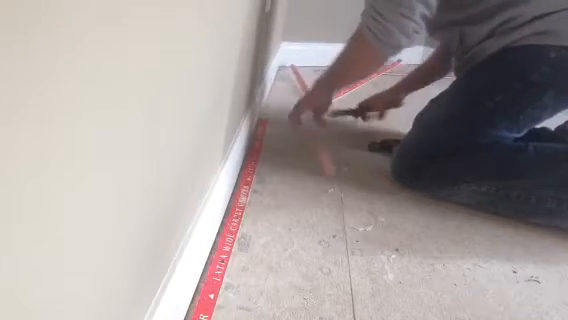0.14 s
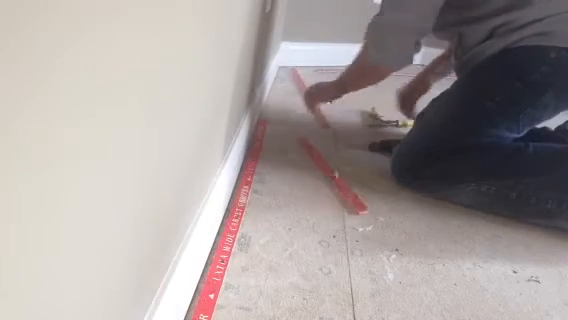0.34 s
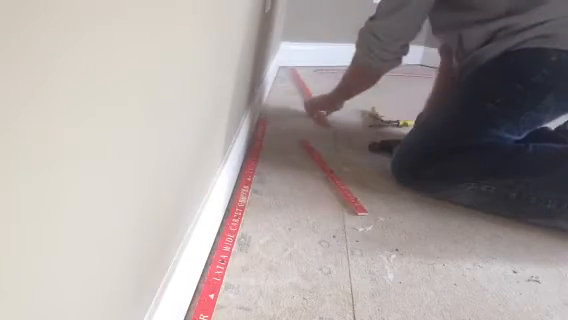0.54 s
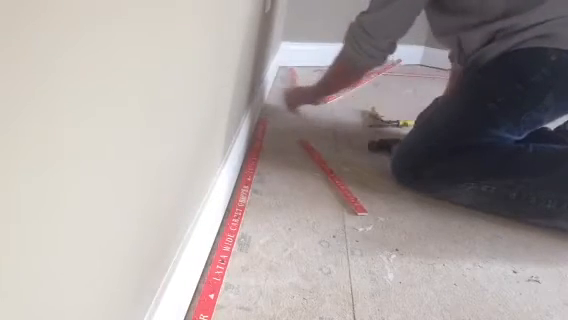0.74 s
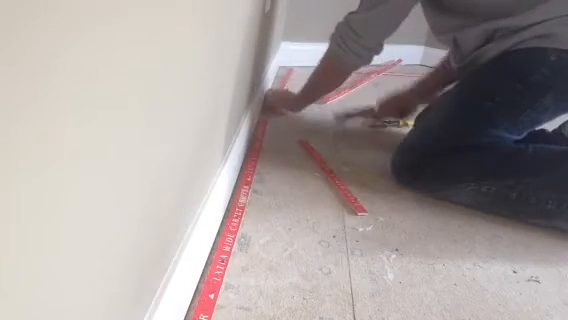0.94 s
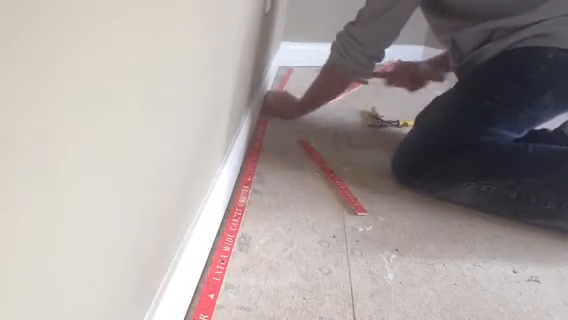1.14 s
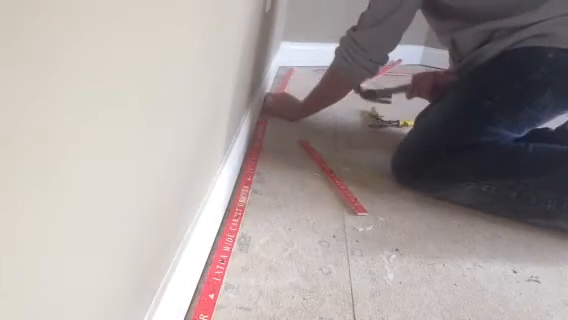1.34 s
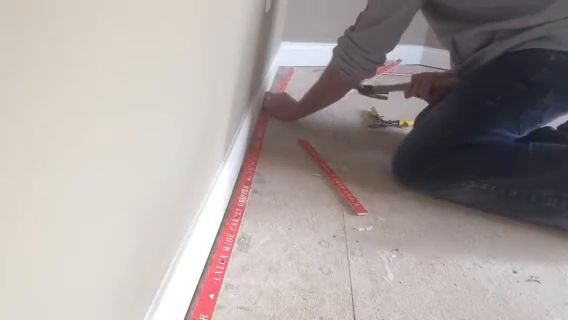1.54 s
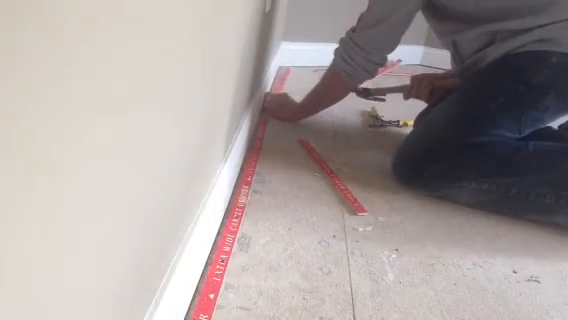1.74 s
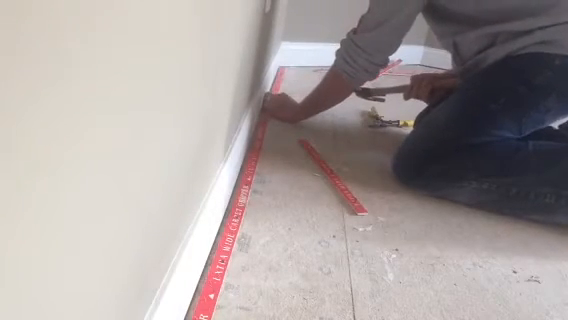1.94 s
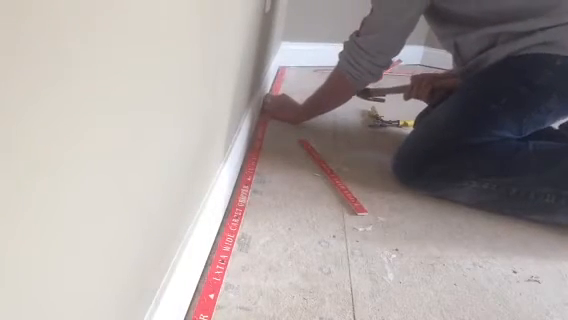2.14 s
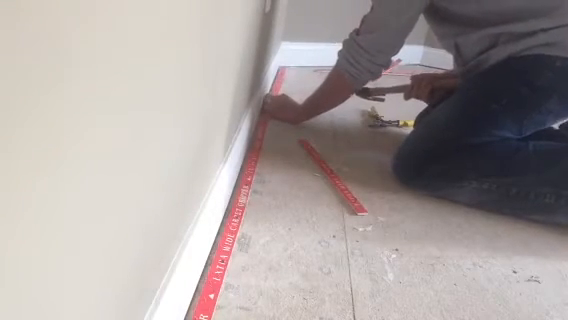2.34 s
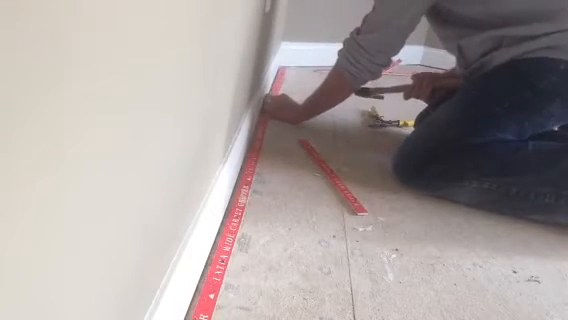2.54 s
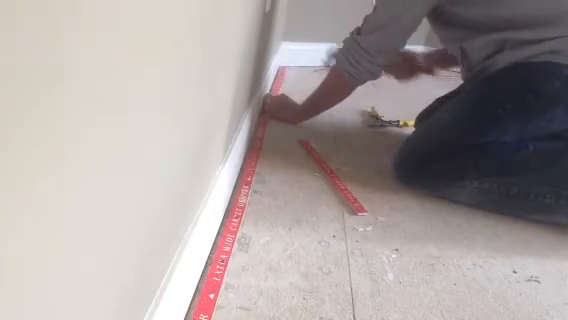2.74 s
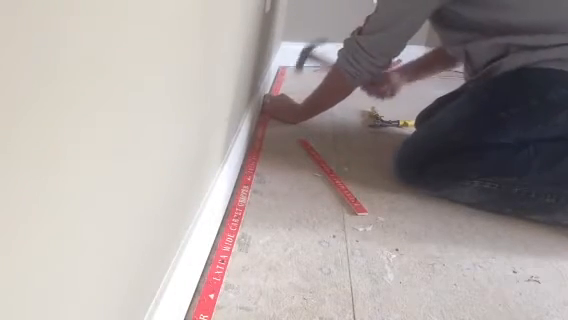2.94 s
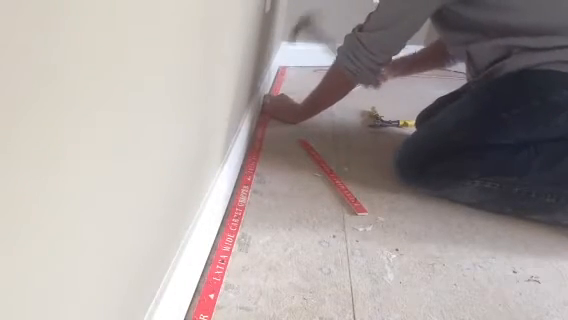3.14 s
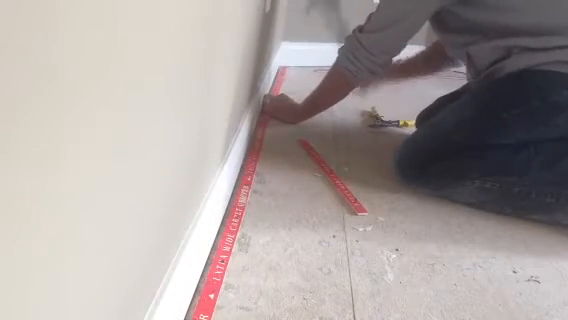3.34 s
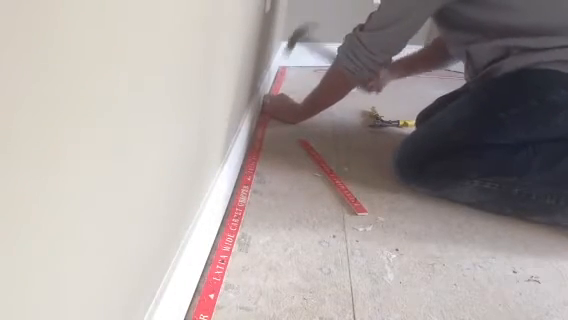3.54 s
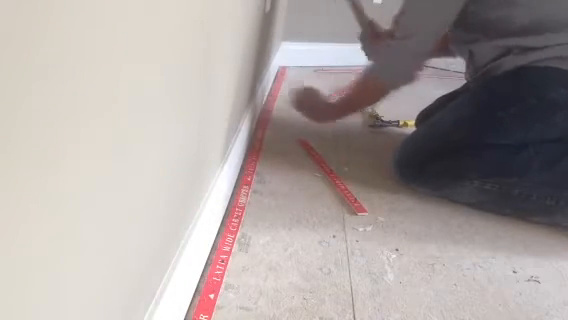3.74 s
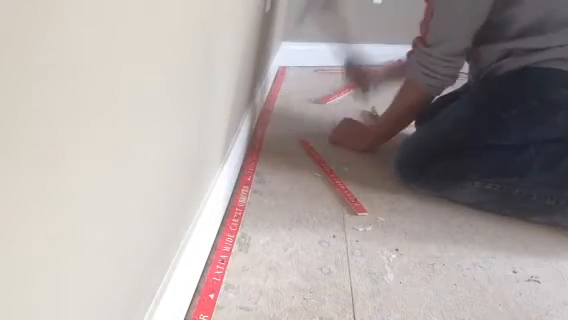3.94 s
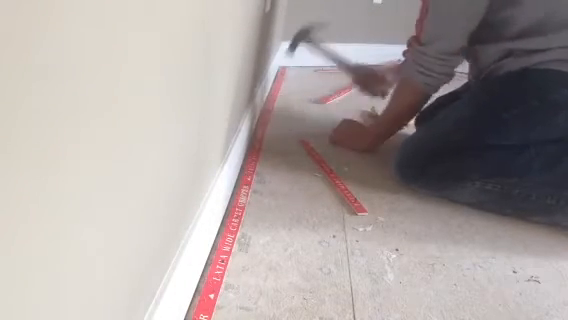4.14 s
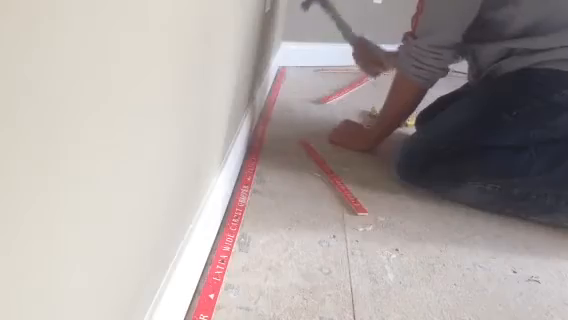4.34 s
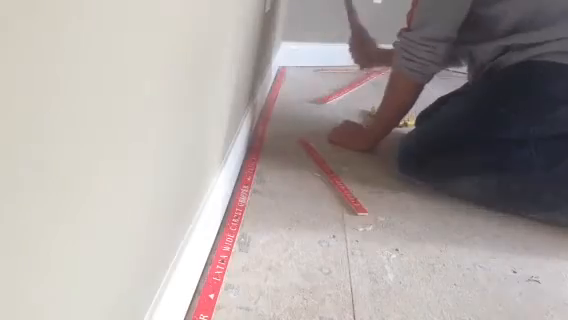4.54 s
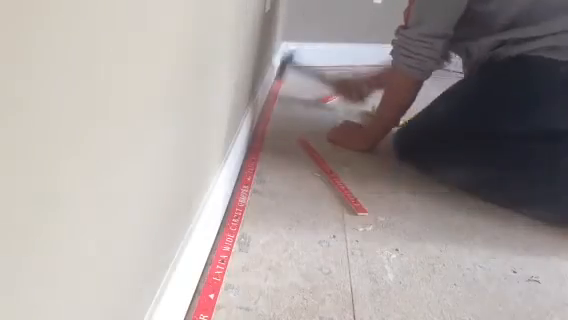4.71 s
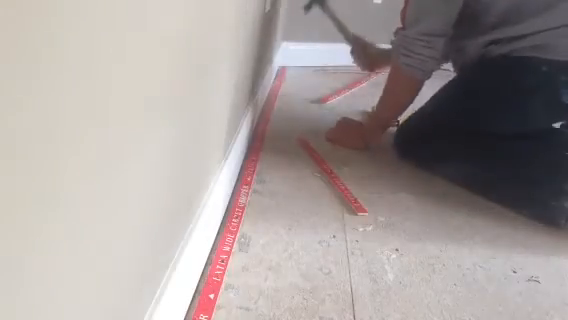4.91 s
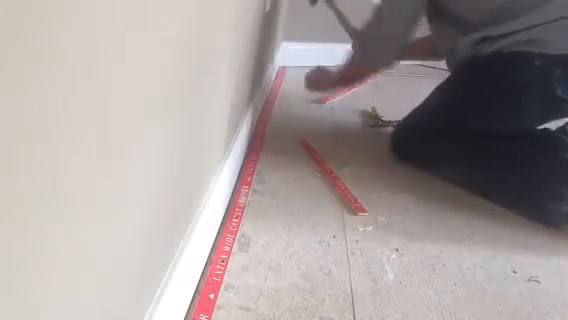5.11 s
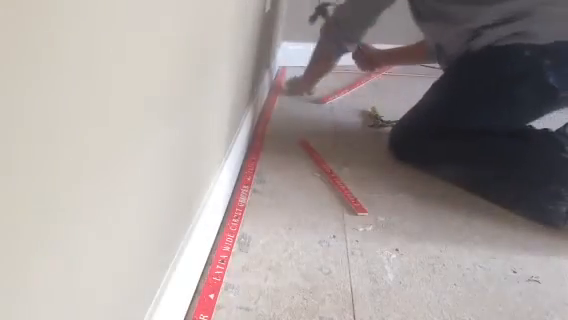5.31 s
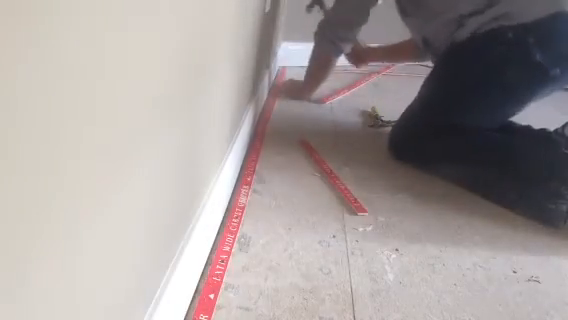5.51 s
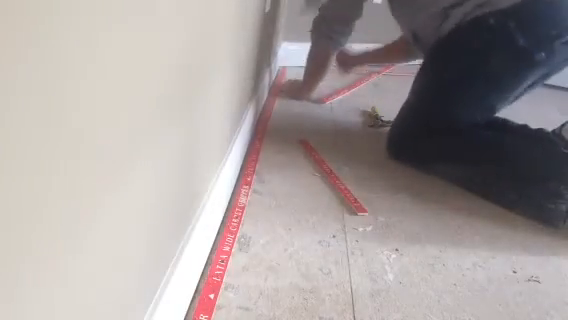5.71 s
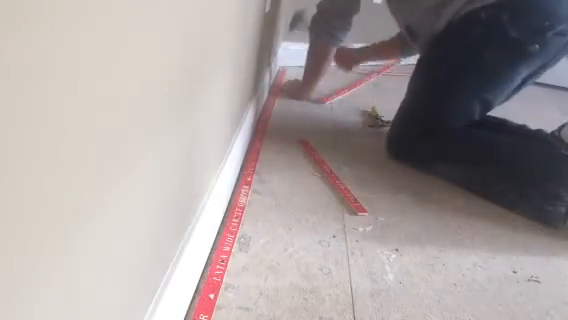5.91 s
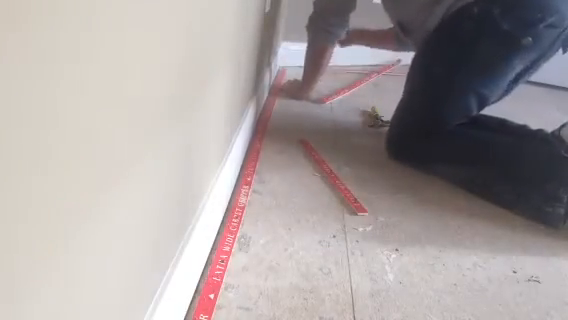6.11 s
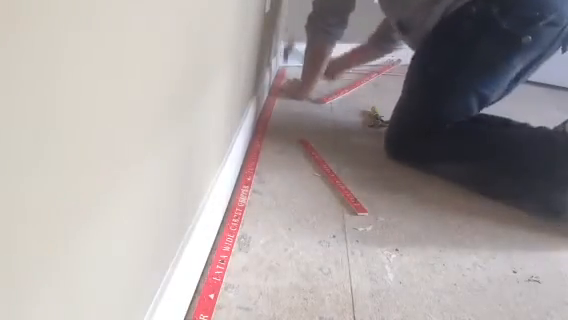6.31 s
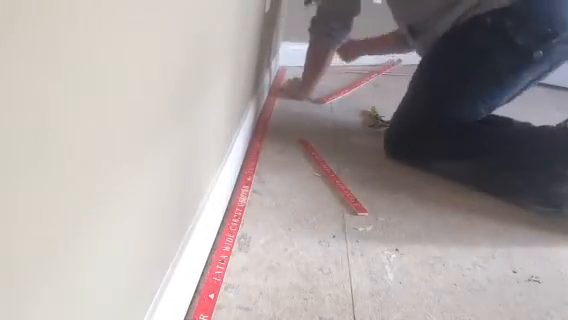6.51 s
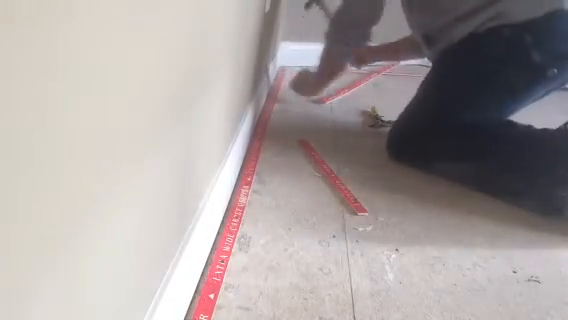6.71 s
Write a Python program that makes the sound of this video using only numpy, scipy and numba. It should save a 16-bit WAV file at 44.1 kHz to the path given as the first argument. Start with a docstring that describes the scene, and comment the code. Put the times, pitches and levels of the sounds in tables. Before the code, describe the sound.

A bare, reverberant room with a wooden board floor, heard from a fairly close microphone over faint low rumble and hiss. At the start the echo of a hammer blow is still dying away. Between about 0.1 and 0.45 s a thin wooden strip and tools drop in a quick, dry, bright clatter, densest around 0.3 to 0.44 s. From 0.8 to 2.2 s there are soft dull bumps of knees and tools, with low shuffling and slight cloth rustle; a very faint stir near 2.6 to 3 s, otherwise quiet. Then hard hammer blows on nails through thin wood: 3.5, 4.1, 4.8, 5.9 and 6.4 s. Each is a short woody knock, with a steely edge on some, its flattened peak followed by a swelling room echo lasting over a second. The blow at 5.9 s is brighter and sharper; the last rings out to the end.

```python
"""The room still rings from a hammer blow as a strip and tools clatter onto a board floor. Soft bumps and
distant footsteps follow amid rustling clothes; then nails go through thin wooden strips. Impacts excite damped
modes of wood and steel; noise with banded decay makes the empty room reverberate. Shaped noise gives cloth,
rumble and hiss. The recorder's limiter flattens loud blows, so that the room swells up behind them."""
import sys
import numpy as np
from scipy import signal
from scipy.io import wavfile
from scipy.ndimage import uniform_filter1d, minimum_filter1d
from numba import njit

SR = 44100
rng = np.random.default_rng(int(sys.argv[2]) if len(sys.argv) > 2 else 0)


def pcm_store(signal):
    """Save signal as 16-bit PCM."""
    levels = np.round(np.clip(np.atleast_2d(signal), -1, 1) * 32767)
    wavfile.write(sys.argv[1], SR, levels.astype(np.int16).T)


def rack_gain(trim_db):
    """Turn a fader trim in dB into the linear factor to multiply a signal by."""
    fader = np.asarray(trim_db, float)
    return 10 ** (fader / 20)


N = 302526
LEAD = SR // 4      # samples computed ahead of time zero, so that earlier sounds ring on into the scene

# hammer blows: t/s, relative level/dB, tilt/(dB per octave), relative steel crack level/dB,
# frequency favoured by the spot f/Hz, its boost/dB
BLOWS = [(-.12, -12.5, -7, 0.5, 211, 11), (3.535, 0, -2.5, -6, 1300, 11.5), (4.128, 5, -4, -10, 927, 5.5),
         (4.799, 2.5, -3, -23, 535, 6.5), (5.898, -6.5, 7, -1, 421, 4.5), (6.420, -1.5, 3, -30, 462, 10.5)]
# centres of the mode groups boom, board, joist, knock and crack: f/Hz
PART_HZ = [110, 230, 480, 1500, 5500]
# limits of third-octave bands, in Hz
BAND_EDGES_HZ = 22 * 2 ** np.arange(0, 9.8, 1 / 3)


def at_hz(points, hz, axis=1):
    """Interpolates a table column linearly in log frequency."""
    points = np.array(points)
    return np.interp(np.log(hz), np.log(points[:, 0]), points[:, axis])


def band(x, low, high):
    """Butterworth band-pass: maximally flat between its two cut-off frequencies in Hz."""
    return signal.sosfilt(signal.butter(2, [low, high], "band", fs=SR, output="sos"), x)


def rms_one(x):
    """Normalises the mean power to one."""
    return x / np.sqrt(np.mean(x ** 2) + 1e-20)


def add(out, sound, s):
    """Superposition: a sound is summed in from time s on."""
    at = LEAD + round(s * SR)
    out[at:at + len(sound)] += sound[:len(out) - at]


def hush():
    """Stationary noise with a set spectral density: rumble of the house and hiss of the microphone."""
    # noise spectrum: f/Hz, relative spectral density level/dB
    spectrum = [(15, -43.5), (25, -13.5), (64, 1.5), (130, -2), (439, -18.5), (516, -26), (1840, -30.5),
                (2220, -30.5), (3340, -35.5), (4250, -33), (10100, -48.5), (14800, -45), (16000, -73)]
    hush_db = -57.5
    white = rng.standard_normal((2, N + LEAD))
    total = 0
    for k, (low, high) in enumerate(zip(BAND_EDGES_HZ, BAND_EDGES_HZ[1:])):
        density = rack_gain(at_hz(spectrum, np.sqrt(low * high)))
        total = total + density * band(white[k % 2], low, high)     # adjacent bands are independent
    return rack_gain(hush_db) * rms_one(total[LEAD:])


def moving():
    """Friction noise under exponential swells: dull shuffling on boards and grainy rustle of cloth."""
    # movements of cloth and knees: t/s of the peak, shuffle level/dB, rustle level/dB
    stirs = [(.9, -40, -66), (1.1, -66, -61), (1.3, -72, -66), (1.46, -49, -69), (1.68, -73, -67.5),
             (1.91, -49.5, -62), (2.22, -55.5, -67), (2.7, -91, -83), (2.96, -68, -67)]
    rise_db_per_s, fall_db_per_s = 137.5, 84
    peak_s, shuffle_db, rustle_db = np.transpose(stirs)
    since = np.arange(N)[:, None] / SR - peak_s
    swell = rack_gain(np.minimum(rise_db_per_s * since, -fall_db_per_s * since))
    white = rng.standard_normal((2, N))
    # random bursts of strength make the noise grainy
    grains = white[1] * rack_gain(3.8 * np.minimum(rng.exponential(1, N), 4))
    shuffle = swell @ rack_gain(shuffle_db) * rms_one(band(white[0], 202, 864))
    rustle = swell @ rack_gain(rustle_db) * rms_one(band(grains, 900, 6100))
    return shuffle + rustle


def room():
    """Reverberation at one spot: diffuse echoes build up and decay per band, first fast, then slowly."""
    # reverberation by frequency: f/Hz, late decay time t60/s, relative echo level/dB
    reverberation = [(61, 1.1, -8), (100, 0.35, -1.5), (172.8, 0.58, 2), (260, 1.066, 0), (323, 1.11, 4.5),
                     (483, 2.05, -1), (723, 1.81, -0.5), (963, 2.27, -5), (1396, 1.69, -3.5),
                     (2350, 1.37, 1.5), (3700, 1.375, -4), (6150, 1.074, 0), (10000, 0.61, 4.5),
                     (16200, 0.52, -1)]
    # lone echoes from the nearest walls: delay t/ms before a random shift of up to 5 %, level/dB
    wall_echoes = [(14, -21), (19, -12), (25, -14), (38, -21.5), (50, -13), (61, -16)]
    echo_db, first_echo_s, build_s = 2.5, 0.0063, 0.0089
    early_db, early_share = 4, 0.45     # early decay: its level, its t60 as a share of the late one
    corner_db, corner_fade_s = -20, 0.0027

    t = np.arange(2 * SR) / SR
    white, tail = rng.standard_normal((2, len(t))), 0
    for k, (low, high) in enumerate(zip(BAND_EDGES_HZ, BAND_EDGES_HZ[1:])):
        hz = np.sqrt(low * high)
        fall_db = -60 * t / at_hz(reverberation, hz)
        decay = rack_gain(fall_db) + rack_gain(early_db + fall_db / early_share)
        strength = rack_gain(at_hz(reverberation, hz, axis=2))
        tail = tail + band(white[k % 2], low, high) * decay * strength
    build = 1 - np.exp(-np.maximum(t - first_echo_s, 0) / build_s)
    echoes = rack_gain(echo_db) * rms_one(tail * build) / np.sqrt(len(t))     # unit energy, then its level
    # scatter from the skirting and tools right beside the hit
    scatter = band(rng.standard_normal(len(t)), 490, 17000) * np.exp(-t / corner_fade_s)
    echoes += rack_gain(corner_db) * scatter
    for ms, level_db in wall_echoes:
        echoes[round(ms * SR / 1000 * rng.uniform(.95, 1.05))] += rack_gain(level_db)
    return echoes


def ring(clicks, hz, t60):
    """Damped resonator: a unit click sets a sine ringing from height 1, falling 60 dB in t60 seconds."""
    r, w = rack_gain(-60 / (t60 * SR)), 2 * np.pi * hz / SR
    return signal.lfilter([0, np.sin(w)], [1, -2 * r * np.cos(w), r * r], clicks + 1e-18)


def impact(levels_db, favoured_hz=1000, favoured_db=0):
    """Modal superposition: a click excites each mode by its own strength; odd and even modes in two rows."""
    # modes of floor, strip and hammer head, one list per part: f/Hz, relative level/dB, t60/s
    part_modes = [
        [(70, -3, 0.024), (82, -1, 0.14), (127, -1.5, 0.036), (172.7, -3, 0.12)],
        [(163, 9, 0.046), (230.6, 0.5, 0.041), (262.4, -2.5, 0.039), (318, -8, 0.037)],
        [(384.8, -11.5, 0.054), (471, -4, 0.029), (537, -2, 0.018)],
        [(717, -0.5, 0.01), (888, -3.5, 0.01), (1014, -2.5, 0.01), (1360, -0.5, 0.01), (1576, -5, 0.0085),
         (1964, 0.5, 0.0055), (2510, -1.5, 0.0046), (3050, -2.5, 0.0029)],
        [(3620, 0, 0.0034), (3933, 1.5, 0.0022), (4720, 1, 0.0019), (6470, 1.5, 0.00096), (8580, -3.5, 0.00063),
         (11600, -26.5, 0.0003), (13800, -13, 0.0017)],
    ]
    favour_octaves, mode_spread_db = 0.19, 3
    click = signal.unit_impulse(SR // 4)
    centres = list(zip(PART_HZ, levels_db))     # strength glides from the centre of one part to the next
    modes = [(at_hz(centres, hz) + db, hz, t60)
             for part in part_modes[:len(centres)] for hz, db, t60 in part]
    octaves = np.log2(np.array(modes)[:, 1] / favoured_hz)
    spot_db = favoured_db * np.exp(-(octaves / favour_octaves) ** 2)
    spot_db = spot_db + mode_spread_db * rng.standard_normal(len(modes))
    # neighbours in opposite phase leave no holes between them
    rings = np.array([ring(click, hz, t60) * rack_gain(db + spot_db[k]) * (-1) ** k
                      for k, (db, hz, t60) in enumerate(modes)])
    halves = [rings[0::2].sum(axis=0), rings[1::2].sum(axis=0)]
    return signal.sosfilt(signal.butter(4, 62, "high", fs=SR, output="sos"), halves)


def struck(row, wood_db):
    """Excitation spectrum: the wood's answer, tilted by how hard and where it is hit, and the steel crack."""
    db, tilt_db, crack_db = row[1:4]
    wood = [db + own_db + tilt_db * np.log2(hz / PART_HZ[2]) for hz, own_db in zip(PART_HZ, wood_db)]
    return wood + [crack_db]


def smeared(sound, ms):
    """Convolution with a noise swell: many small pushes draw a sound out at unchanged energy."""
    size = round(ms * SR / 1000)
    pushes = rng.standard_normal(size) * np.hanning(size)
    swell = signal.fftconvolve(sound, pushes[None], axes=1)
    return swell * np.linalg.norm(sound) / np.linalg.norm(swell)


def heard(rows, sounds, rooms, shadow_hz, direct_db, echo_db):
    """Direct plus reverberant sound; arms and knees shade the treble of the direct path."""
    out = np.zeros(N + LEAD)
    shadow = signal.butter(1, shadow_hz, fs=SR, output="sos")
    for k, (row, sound) in enumerate(zip(rows, sounds)):
        direct = signal.sosfilt(shadow, sound.sum(axis=0))
        add(out, rack_gain(direct_db) * direct, row[0])
        for side, half in enumerate(sound):     # the two sets of modes radiate in other directions
            echo = signal.fftconvolve(half, rooms[(k + side) % len(rooms)])
            add(out, rack_gain(echo_db) * echo, row[0])
    return out


def bumps(rooms):
    """Long contacts excite the lower modes only: soft, dull bumps on the boards and distant footsteps."""
    # t/s, relative boom level/dB, relative board level/dB, relative joist level/dB, contact time t/ms
    bump_rows = [(0.819, -24.5, -32, -45.5, 32.5), (.972, -34, -5.5, -39, 1.8),
                 (1.06, -28, -21.5, -50, 19.6), (1.369, -30.5, -24, -25, 73), (1.61, -22, -26, -35.5, 46),
                 (1.789, -16, -30.5, -36, 83), (1.999, -21, -31, -48.5, 100),
                 (2.612, -43.5, -76.5, -80.5, 110), (5.5, -32.5, -45.5, -33, 110)]
    soft = [smeared(impact(row[1:-1]), row[-1]) for row in bump_rows]
    return heard(bump_rows, soft, rooms, shadow_hz=630, direct_db=-2, echo_db=-7)


def clatter(rooms):
    """A high direct-to-reverberant ratio: a strip and tools fall near the microphone."""
    # knocks: t/s, relative level/dB, tilt/(dB per octave), relative crack level/dB
    knock_rows = [(0.117, -15.5, 1.1, -33.5), (0.239, -45, -1.4, -23), (0.287, -25, 0, -18),
                  (0.307, -15.5, 6.5, -15.5), (.338, -16.5, -3.5, -32), (.361, -18.5, -2, -25),
                  (.392, -12.5, 3.5, -9.5), (.414, -17, 6, -53), (.425, -16.5, 6, -50.5),
                  (0.438, -20, 4.5, -36.5), (1.045, -41, 6.5, -57)]
    # answer of the wood in boom, board, joist and knock: relative level/dB
    wood_db = (-22, 1.5, -1.6, 5.5)
    knocks = [impact(struck(row, wood_db)) for row in knock_rows]
    return heard(knock_rows, knocks, rooms, shadow_hz=6400, direct_db=2.5, echo_db=-6.0)


def hammer(rooms):
    """Impulsive excitation: blows ring wood modes and a steel crack, then the reverberant room."""
    # answer of the wood in boom, board, joist and knock: relative level/dB
    wood_db = (-24, -6, -2, -6)
    lead_s, blur_db, blur_low_hz, blur_high_hz = .0135, -19, 120, 1500
    blows = [impact(struck(row, wood_db), *row[-2:]) for row in BLOWS]
    out = heard(BLOWS, blows, rooms, shadow_hz=4600, direct_db=-5.5, echo_db=0.5)
    # a faint dull blur ahead of each blow
    for row, blow in zip(BLOWS, blows):
        dull = band(band(blow, blur_low_hz, blur_high_hz), blur_low_hz, blur_high_hz)
        blur = smeared(dull, 7.6).sum(axis=0)
        add(out, rack_gain(blur_db) * blur, row[0] - lead_s)
    return out


def scene():
    """Linear superposition of all sources; the impacts share one set of room responses."""
    rooms = [room() for blow in BLOWS]
    impacts = hammer(rooms) + clatter(rooms) + bumps(rooms)
    return (impacts[LEAD:] + moving() + hush())[None]


@njit
def held_peak(level, fall):
    """Peak detector: jumps to every peak and sinks back exponentially."""
    out, held = np.empty_like(level), 0.
    for i in range(len(level)):
        held = max(level[i], held * fall)
        out[i] = held
    return out


def top_cut(x):
    """Nothing passes above the cut-off."""
    return signal.sosfilt(signal.butter(12, 16310, fs=SR, output="sos"), x)


def record(dry):
    """Look-ahead gain control limits peaks and recovers exponentially; a low-pass cuts the top."""
    ceiling_db, attack_s, release_s, cutoff_hz = -3.4, .0005, .022, 16200
    reach = max(1, round(attack_s * SR))
    peak = held_peak(np.abs(dry[0]), np.exp(-1 / (release_s * SR)))
    needed = np.minimum(1, rack_gain(ceiling_db) / (peak + 1e-9))
    gain = minimum_filter1d(needed, 2 * reach + 1)      # falls ahead of each peak
    limited = dry * uniform_filter1d(gain, reach)
    mix = signal.sosfilt(signal.cheby2(12, 60, cutoff_hz, fs=SR, output="sos"), limited)
    return top_cut(mix)


dry = scene()
out = record(dry)
pcm_store(out)
```